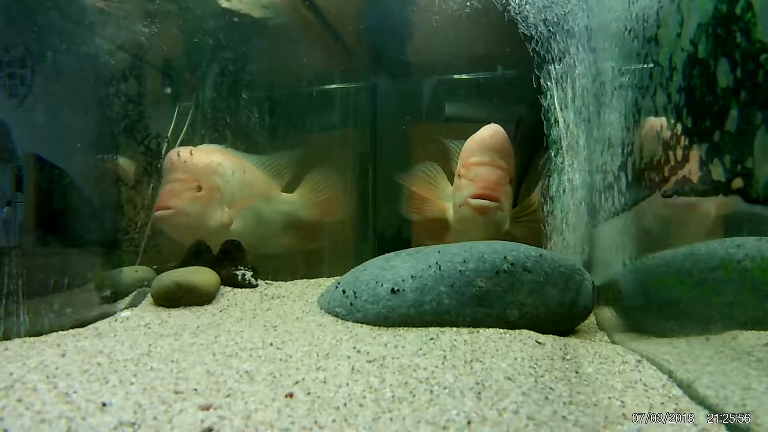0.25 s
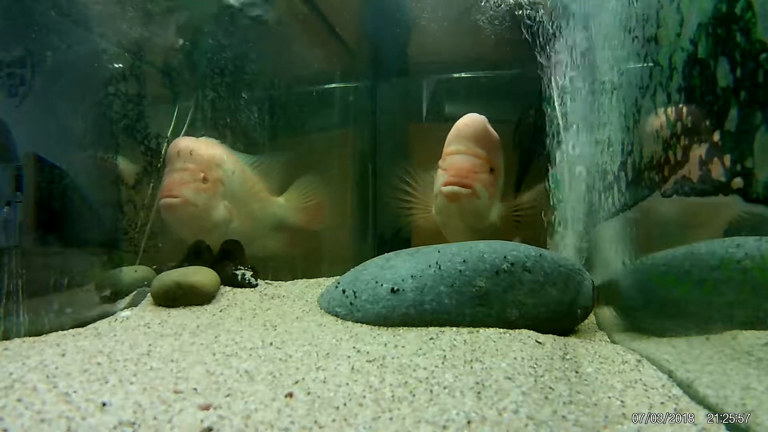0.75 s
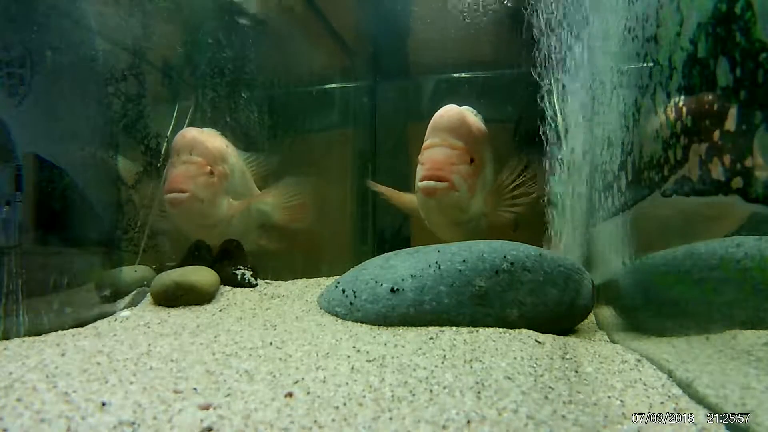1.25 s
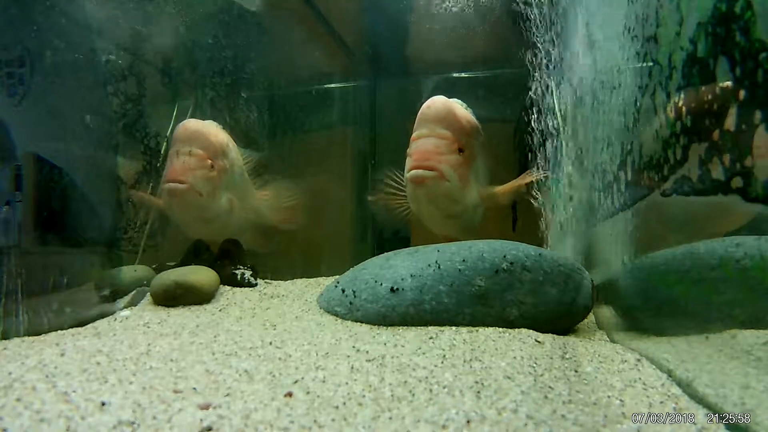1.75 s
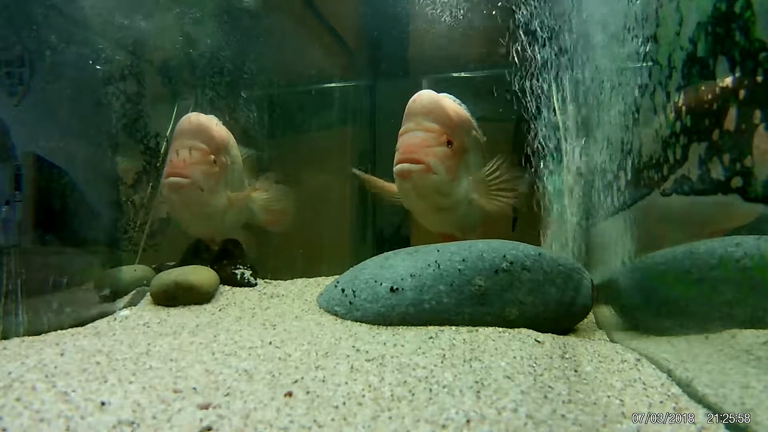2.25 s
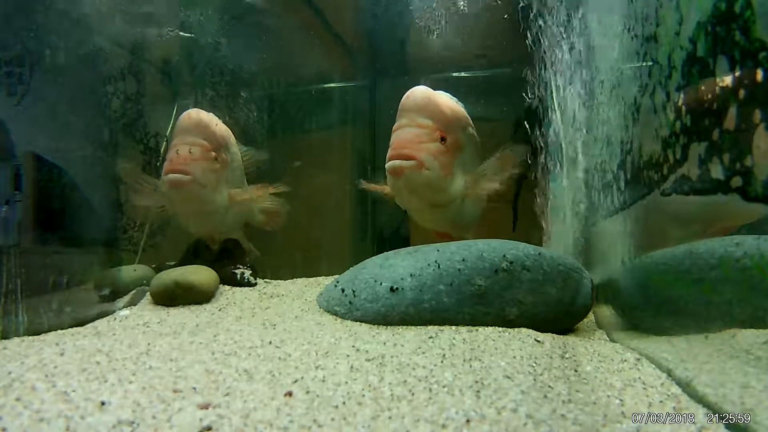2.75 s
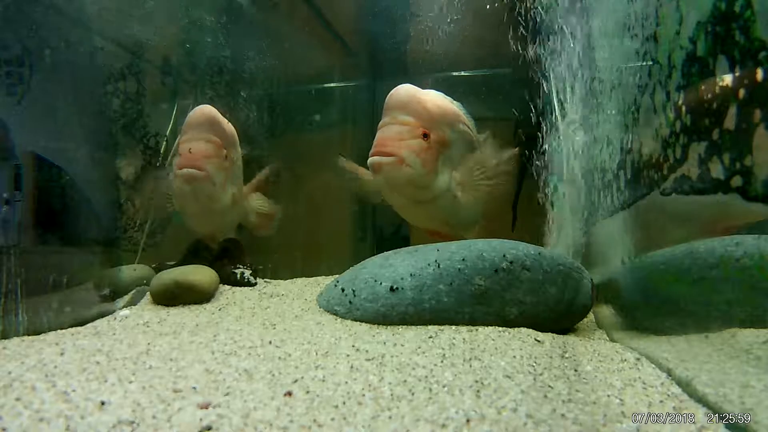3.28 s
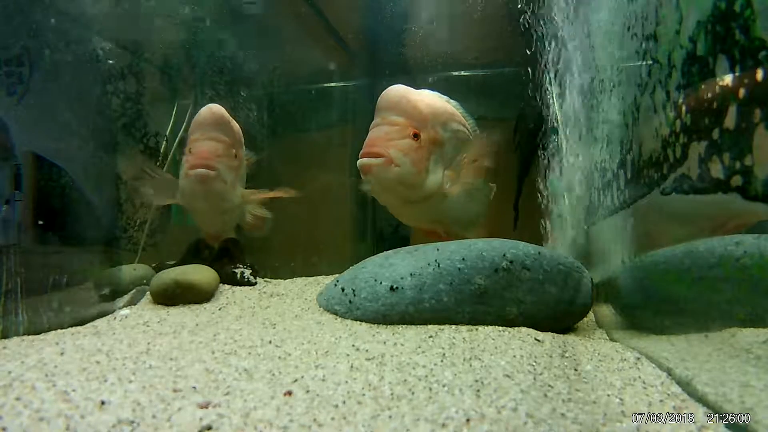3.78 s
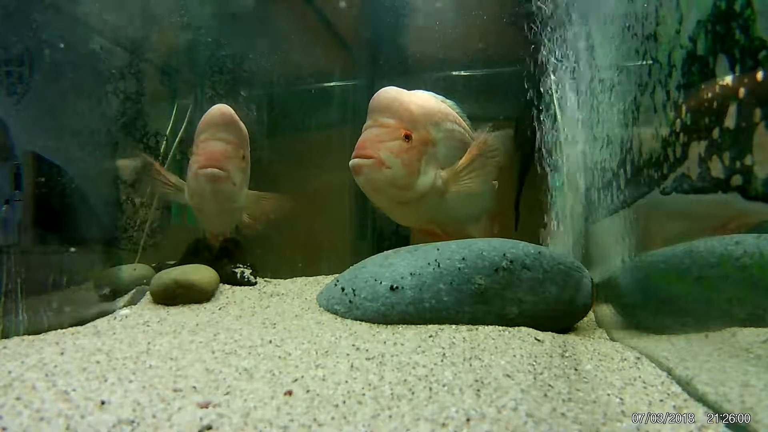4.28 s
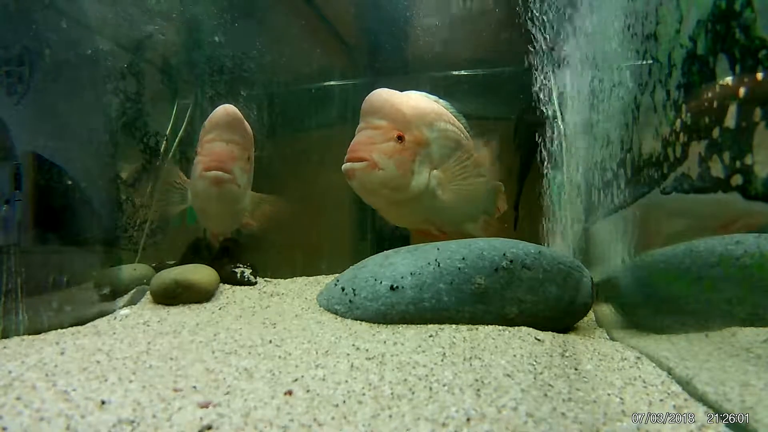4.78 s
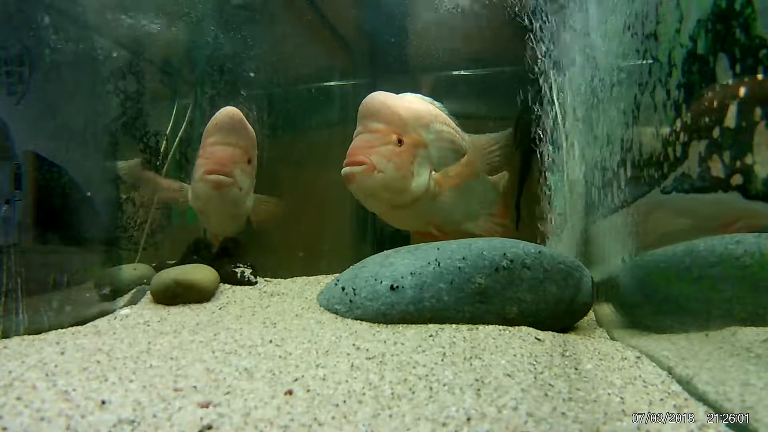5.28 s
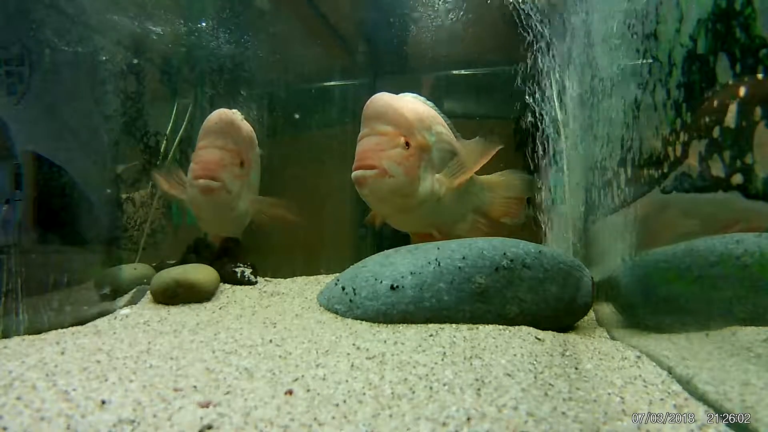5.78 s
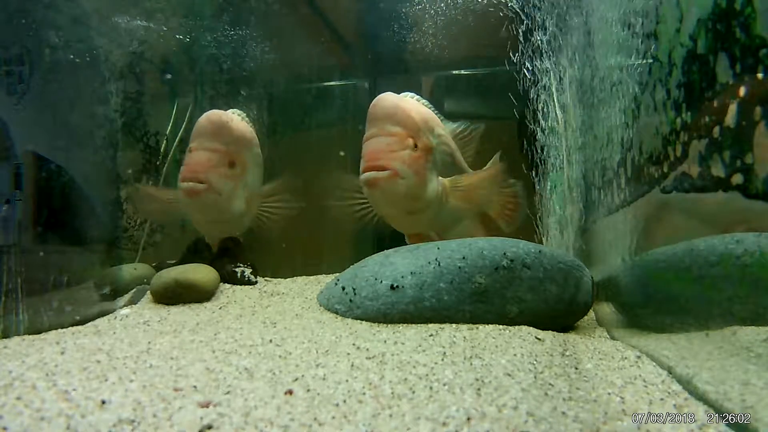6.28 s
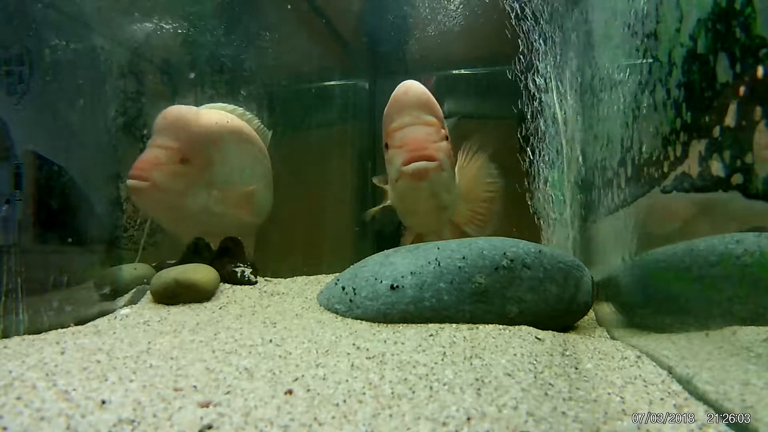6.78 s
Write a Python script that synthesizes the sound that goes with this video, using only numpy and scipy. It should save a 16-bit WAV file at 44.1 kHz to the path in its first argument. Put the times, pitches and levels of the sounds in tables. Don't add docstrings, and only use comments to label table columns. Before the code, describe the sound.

Under water in a home aquarium, a deep buzzing pump drone mixes with bubbling gulps, watery ringing and a soft, fine hiss.

```python
import sys
import numpy as np
from scipy import signal
from scipy.fft import rfft, irfft, next_fast_len
from scipy.io import wavfile
from scipy.ndimage import uniform_filter1d, map_coordinates

SR = 44100
rng = np.random.default_rng(int(sys.argv[2]) if len(sys.argv) > 2 else 0)


def wrap_up_sound(samples):
    columns = np.atleast_2d(samples).T
    tamed = np.clip(columns, -1, 1)
    steps = np.round(tamed * 32767).astype(np.int16)
    wavfile.write(sys.argv[1], SR, steps)


def gain_from_decibels(decibels):
    exponent = np.asarray(decibels, float) / 20
    return 10 ** exponent


N = 310464
TIME_S = np.arange(N) / SR
STROKE_HZ = 99.916
WALL_STEEP = 2.2


def unit(x):
    return x / np.sqrt(np.mean(x ** 2) + 1e-20)


def noise():
    return rng.standard_normal(N)


def curves(rows):
    time_s, *columns = np.transpose(rows)
    return [np.interp(TIME_S, time_s, column) for column in columns]


def wobble(knots_per_s):
    knots = rng.standard_normal(int(N * knots_per_s / SR) + 4)
    return map_coordinates(knots, [np.arange(N) * knots_per_s / SR])


def tone(pitch_hz):
    return np.sin(2 * np.pi * np.cumsum(pitch_hz) / SR)


def filtered(x, response):
    size = next_fast_len(N + 8192)
    return irfft(rfft(x, size) * response(np.fft.rfftfreq(size, 1 / SR)), size)[:N]


def ringing(x, modes, steep):
    def response(f):
        power = 0
        for center_hz, width_hz, level_db in modes:
            damping = (f * width_hz) ** 2
            peak = damping / ((center_hz * center_hz - f * f) ** 2 + damping)
            power = power + gain_from_decibels(2 * level_db) * peak ** steep
        return np.sqrt(power)
    return unit(filtered(x, response))


def bubbles(count, hz, spread, cycles, size_db):
    when = rng.random(count)
    pitch = rng.standard_normal(count)
    size = rng.exponential(1, count)
    f = np.clip(hz * np.exp(spread * pitch), 40, 9000)[:, None]
    turns = np.arange(int(4 * cycles * SR / hz))[None] / SR * f
    grain = np.exp(-turns / cycles) * np.sin(2 * np.pi * turns * (1 + .06 * turns / cycles))
    grain *= gain_from_decibels(size_db * size)[:, None] * np.sqrt(f / hz)
    where = (when * N).astype(int)[:, None] + np.arange(turns.shape[1])
    return unit(np.bincount(where.ravel(), grain.ravel(), N)[:N])


def blend(grains, share):
    return np.sqrt(share) * grains + np.sqrt(1 - share) * noise()


# time_s, stroke_db, second_harmonic_db (lopsidedness)
PUMP_LOAD = [(0, -33.1, -51), (1.15, -36, -56.5), (1.55, -35, -61), (2.1, -31.7, -47.5), (2.7, -30.4, -44),
             (3.3, -32, -45.5), (3.7, -34.5, -45.5), (4, -33.3, -44), (4.9, -39.5, -46), (5.5, -41, -44.5),
             (5.9, -37, -45), (6.7, -35.6, -44.5), (7.04, -37, -45.5)]
# multiple, level_db, follows_lopsidedness_db_per_db
OTHER_HARMONICS = [(.5, -61, 0), (3, -34.3, .05), (3.5, -53, 0), (4, -37.2, -.05), (5, -48, .2),
                   (6, -44.5, .15), (8, -59, 0)]
AGAINST_MAGNET = (1, 2, 6)


def pump():
    stroke = 2 * np.pi * STROKE_HZ * TIME_S + 2.0
    wall_lag_rad = 1.65
    first_db, second_db = curves(PUMP_LOAD)
    levels = [(1, first_db), (2, second_db)]
    for k, db, follows in OTHER_HARMONICS:
        levels.append((k, db + follows * (second_db + 45)))
    hum = np.zeros(N)
    for k, db in levels:
        sign = -1 if k in AGAINST_MAGNET else 1
        hum += np.sqrt(2) * gain_from_decibels(db) * sign * np.cos(k * stroke - wall_lag_rad)
    return hum


# center_hz, width_hz, level_db
SLOSH_MODES = [(33, 20, -15), (51, 12, -10), (71, 20, 0), (88, 24, -7)]


def slosh():
    return gain_from_decibels(-48.5 + 0.67 * wobble(2)) * ringing(noise(), SLOSH_MODES, WALL_STEEP)


# center_hz, width_hz, level_db
THROB_MODES = [(148, 22, 0), (164, 24, -1), (122, 30, -13), (185, 24, -11)]


def throb():
    return gain_from_decibels(-46) * ringing(noise(), THROB_MODES, WALL_STEEP)


# peak_s, level_db
CLOUD_GULPS = [(.02, -41), (.4, -41), (.53, -40.5), (.74, -40.5), (.81, -39), (.91, -40.5), (1.0, -42),
               (1.08, -42.5), (1.18, -43), (1.35, -35), (1.45, -42.5), (1.57, -39), (1.79, -40.5),
               (2.02, -42.5), (2.17, -40), (2.37, -42), (2.49, -39), (2.9, -46.5), (3.1, -40), (3.38, -38),
               (3.58, -44.5), (4.06, -45), (4.3, -38.5), (4.67, -41.5), (4.86, -42.5), (5.16, -43.5),
               (5.31, -37.5), (5.99, -39), (6.22, -42.5), (6.95, -38)]


def gulp_swell():
    half_width_s = 0.023
    return sum(gain_from_decibels(db) * np.exp(-.5 * ((TIME_S - s) / half_width_s) ** 2) for s, db in CLOUD_GULPS)


def gulps(swell):
    return np.sqrt(2) * gain_from_decibels(-2.0) * swell * tone(156 + 6 * wobble(9))


# center_hz, width_hz, level_db
WALL_MODES = [
    [(235, 30, -10), (251, 26, -4.5), (268, 22, -7), (325, 46, 0), (368, 40, -7)],
    [(420, 60, 0), (465, 90, -3), (525, 60, -7.5), (552, 24, -8)],
    [(612, 30, -3), (642, 70, -1), (720, 140, -4.5), (830, 100, -9)],
]


def walls(swell):
    level_db, shake = [-44, -44.5, -46], [0.26, 0.11, 0.056]
    shaking = blend(bubbles(count=1800, hz=453.3, spread=0.453, cycles=5, size_db=0.9), share=0.038)
    lift = uniform_filter1d(unit(swell), 3000)
    out = np.zeros(N)
    for modes, db, depth in zip(WALL_MODES, level_db, shake):
        apart = np.roll(shaking, rng.integers(N))
        out += gain_from_decibels(db) * (1 + depth * lift) * ringing(apart, modes, WALL_STEEP)
    return out


def tank():
    swell = gulp_swell()
    return slosh() + throb() + gulps(swell) + walls(swell)


# time_s, focus_db (on favourite size), wide_pores_open_db, pore_hz (busiest pore)
STONE_STATE = [(0, -3, -1, 1450), (.5, -1, 1.5, 1520), (.9, 5, 1, 1530), (1.5, -2, 1.5, 1520),
               (1.75, -0.5, 2, 1650), (2, 0.5, 2.5, 1660), (2.4, -0.5, -1, 1500), (2.75, 2, 0, 1420),
               (3, 0.5, -1, 1430), (3.5, -2, 0, 1560), (3.9, -0.5, 1, 1520), (4.25, -2.5, 1, 1450),
               (4.5, -2, -4.5, 1470), (4.9, 0.5, -2.5, 1490), (5.25, 0, -3, 1490), (6.2, -2.5, -1, 1500),
               (6.6, -0.5, 1.5, 1520), (7.04, 4.5, 0.5, 1540)]


def stone_state():
    return curves(STONE_STATE)


# center_hz, width_hz, level_db
SIZE_MODES = [
    [(975, 110, -0.1), (1190, 310, -2)],
    [(1319, 180, -1.5)],
    [(1470, 51, -4.5), (1517, 120, -1.5)],
    [(1660, 160, 0)],
]
# level_db, follows_focus_db_per_db, follows_wide_pores_db_per_db
SIZE_MIX = [(-53.5, 0.21, -.3), (-50, -0.31, 0.97), (-49, .9, 0), (-53.5, -.8, -0.11)]


def stream(focus_db, wide_db):
    out = np.zeros(N)
    for modes, (db, follows, opens) in zip(SIZE_MODES, SIZE_MIX):
        born = bubbles(count=3500, hz=modes[-1][0], spread=.1, cycles=9, size_db=-0.9)
        level_db = db + follows * focus_db + opens * wide_db + 0.43 * wobble(3)
        out += gain_from_decibels(level_db) * ringing(blend(born, share=0.1), modes, steep=1.68)
    return out


def pore(pore_hz):
    births_per_s, scatter_hz = 45, 25.03
    note = tone(pore_hz + scatter_hz * wobble(30))
    return gain_from_decibels(-53.5) * unit(wobble(births_per_s) * note)


# center_hz, width_hz, level_db
CASE_MODES = [(1872, 155, -0.5), (2084, 99, -7.5), (2262, 300, -8.5), (2758, 290, -10.5), (3243, 400, -19),
              (3826, 520, -21), (4166, 180, -21), (4800, 260, -34), (6330, 220, -37.5), (6800, 500, -40)]
# center_hz, width_hz, level_db
PORT_MODES = [(5320, 400, 0.088), (5695, 320, -1.1)]
# time_s, fineness_db
SPRAY_FINENESS = [(0, -2), (1, -2.5), (1.7, -1), (3, 1), (4.4, 0.8), (5.1, 0.5), (5.8, 1.5), (7.04, -0.5)]


def spray():
    fizz = blend(bubbles(count=12000, hz=3295, spread=.6, cycles=4, size_db=0.5), share=0.13)
    fineness_db, = curves(SPRAY_FINENESS)
    port = gain_from_decibels(fineness_db - 26) * ringing(fizz[::-1], PORT_MODES, steep=1.7)
    return gain_from_decibels(-53) * (ringing(fizz, CASE_MODES, steep=1.86) + port)


def curtain():
    puff = 1 + 0.023 * np.cos(2 * np.pi * STROKE_HZ * TIME_S)
    focus_db, wide_db, pore_hz = stone_state()
    return puff * (stream(focus_db, wide_db) + pore(pore_hz) + spray())


# start_s, peak_db, pitch_hz
SNAPS = [(.457, -65, 6600), (.465, -64, 6200), (.6535, -63, 8800), (.6545, -69, 10000), (.927, -65, 6200),
         (.9365, -60, 5400), (1.8365, -57, 4500), (1.8405, -60, 4900), (3.6636, -52.5, 4800),
         (3.6645, -53, 5350), (3.6665, -57, 4400), (3.6705, -57, 5200), (3.78, -64, 6200),
         (5.699, -61, 6600), (5.715, -69, 8600), (5.807, -68, 8600)]


def ticks():
    out = np.zeros(N + SR)
    t = np.arange(SR // 50) / SR
    for start_s, db, hz in SNAPS:
        note = np.sin(2 * np.pi * hz * t * (1 + 8 * t))
        decay = gain_from_decibels(db + 2 - 60 * t / .010)
        attack = 1 - np.exp(-t / .0008)
        start = round(start_s * SR)
        out[start:start + len(t)] += decay * attack * note
    return out[:N]


def scene():
    return (pump() + tank() + curtain() + ticks())[None]


# frequency_hz, density_db (per Hz)
HISS_SPECTRUM = [(20, 14.5), (60, 10), (6500, 1), (7800, -2.5), (8800, -0.5), (12000, -1.5), (13300, -0.5),
                 (14500, 2), (15700, 2.5)]


def hiss():
    hz, db = np.transpose(HISS_SPECTRUM)
    shaped = filtered(noise(), lambda f: gain_from_decibels(np.interp(np.log(f + 1), np.log(hz), db)))
    return gain_from_decibels(-76) * unit(shaped)


def low_pass(x):
    return signal.sosfilt(signal.butter(12, 16960, fs=SR, output="sos"), x)


def record(dry):
    top_hz = 15730
    kept = filtered(dry[0] + hiss(), lambda f: f < top_hz)
    return low_pass(kept[None])


dry = scene()
out = record(dry)
wrap_up_sound(out)
```